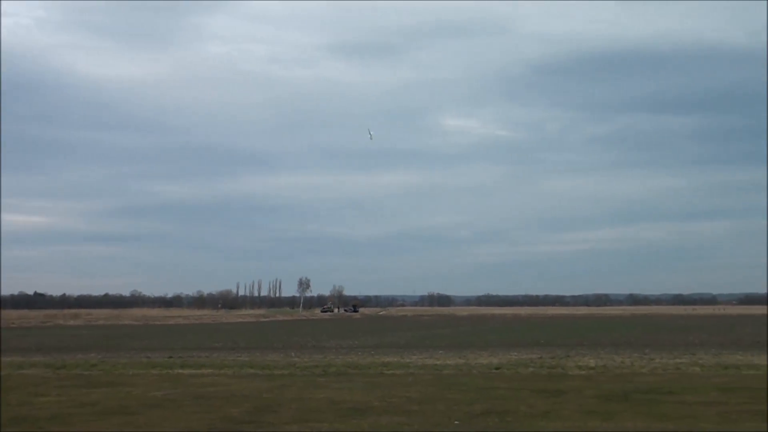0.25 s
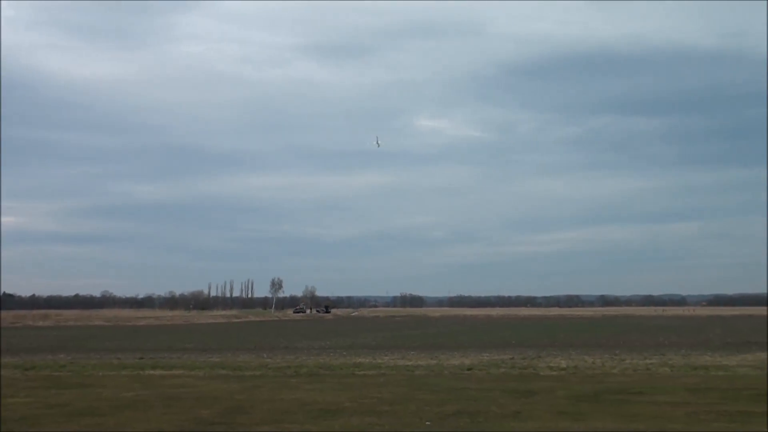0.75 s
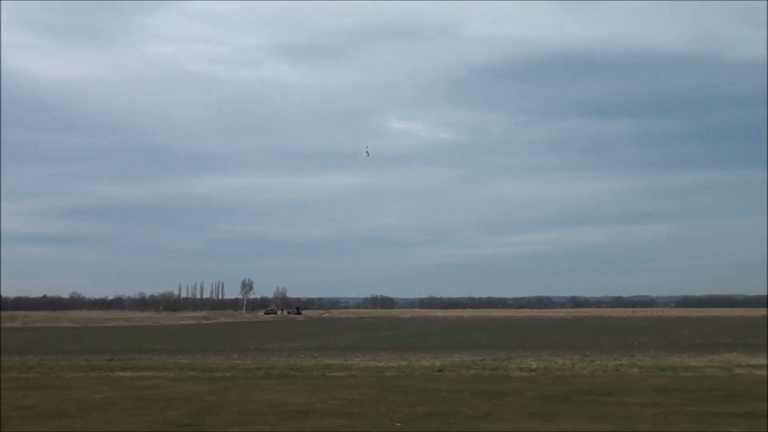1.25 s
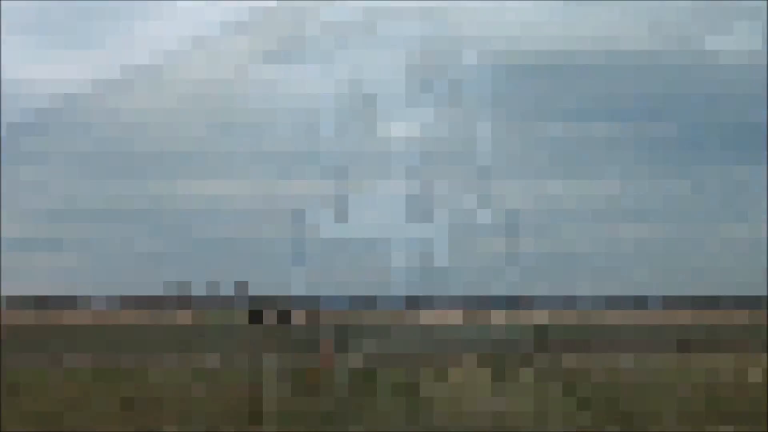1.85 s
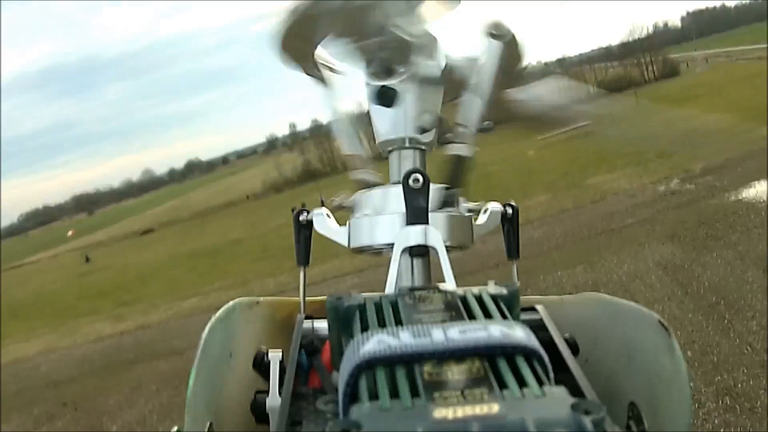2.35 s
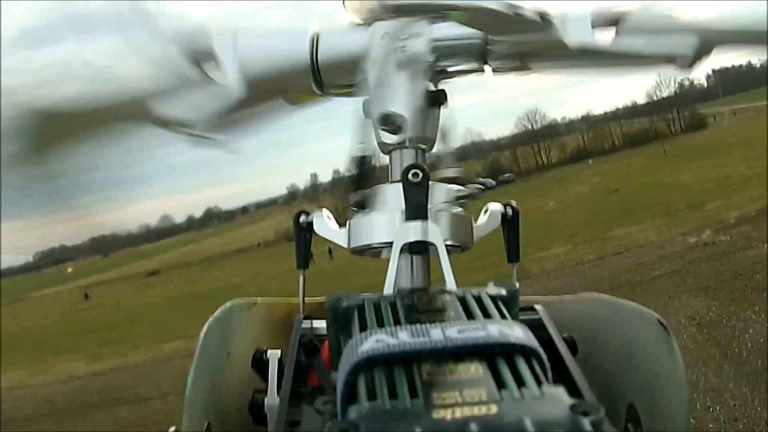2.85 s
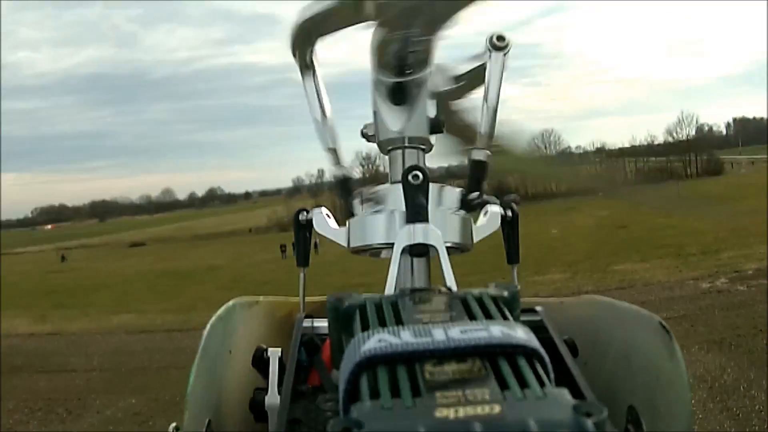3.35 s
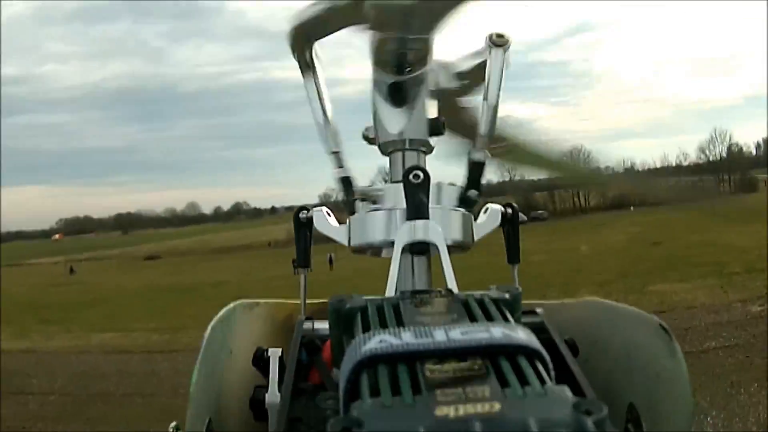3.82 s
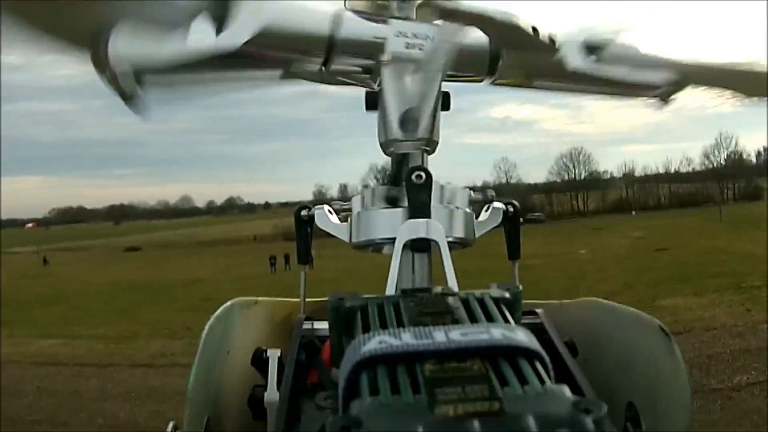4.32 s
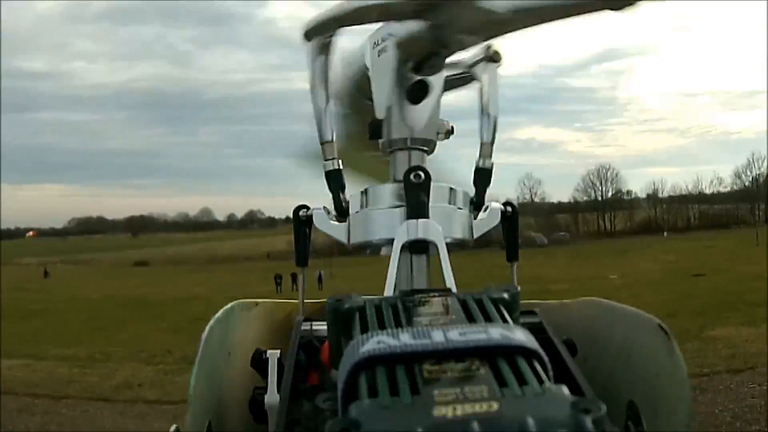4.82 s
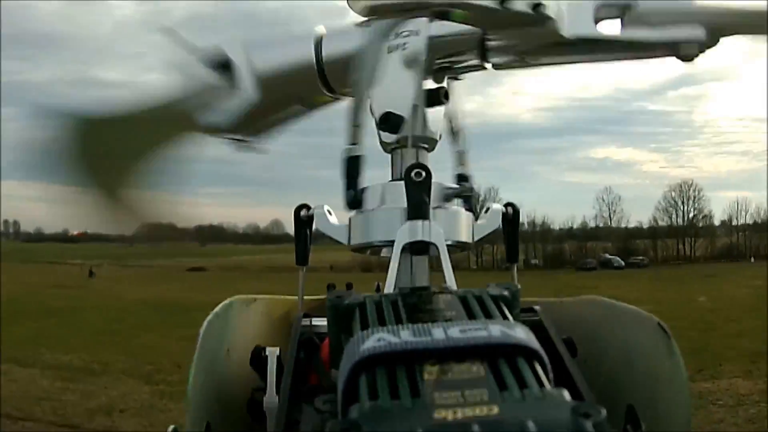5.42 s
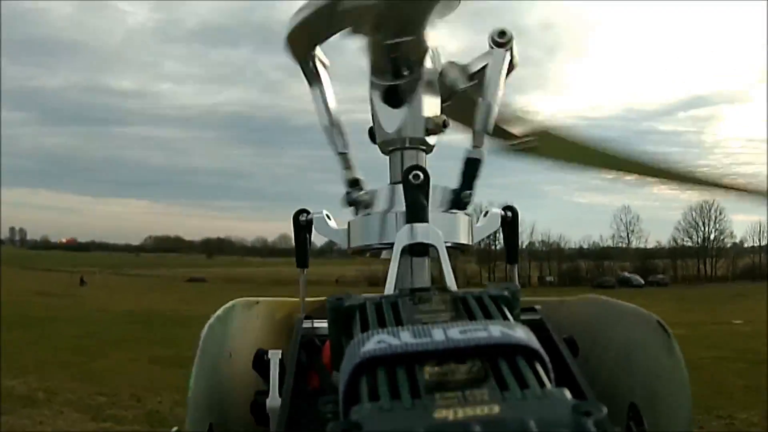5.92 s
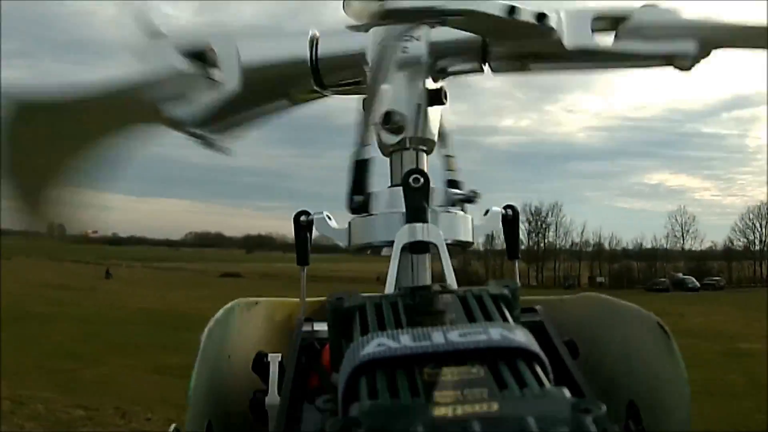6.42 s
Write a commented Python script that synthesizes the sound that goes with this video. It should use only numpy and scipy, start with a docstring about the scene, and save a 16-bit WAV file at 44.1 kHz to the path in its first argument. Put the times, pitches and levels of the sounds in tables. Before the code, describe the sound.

In an open field, wind rumbles and slaps against a microphone on the ground while an electric model helicopter passes high up, its blades swishing and gears whining thinly as it recedes. After about two seconds the sound fades over to a microphone riding on the helicopter. The motor becomes a harsh, overloaded buzz at one steady pitch, roughened by rattling and breaking at times into a rapid, sizzling flutter.

```python
"""In a field, an electric model helicopter circles high up while wind buffets a microphone on the ground.
Its blades swish, its tail rotor buzzes and its gears whine. Near 1.9 s the sound fades over to a camera
riding on the helicopter. There the motor's shaking overloads the microphone into a square-wave drone,
roughened by the tail shaft, gears and blades. At times the drone flutters."""
import sys
import numpy as np
from scipy import signal
from scipy.fft import rfft, irfft, next_fast_len
from scipy.io import wavfile
from scipy.ndimage import uniform_filter1d, map_coordinates

SR = 44100
rng = np.random.default_rng(int(sys.argv[2]) if len(sys.argv) > 2 else 0)


def store_wav(level_fs):
    """Save 16-bit WAV to argv[1]."""
    pcm = np.round(np.clip(np.atleast_2d(level_fs), -1, 1) * 32767)
    wavfile.write(sys.argv[1], SR, pcm.T.astype(np.int16))


N = 294147

# Tone colours, or how strong each pitch is next to the others: pitch_hz, gain_db
WIND_RUMBLE = [(12, -42), (20, -24), (91, 0), (117, -1), (164, -2), (244, -5.5), (277, -10.5), (399, -18.5),
               (507, -24.5), (900, -30.5), (1170, -41), (1980, -120)]
BUFFET_BODY = [(40, -35), (130, -7.5), (300, -2.5), (460, -11), (800, -29), (1500, -41), (4000, -51),
               (9000, -120)]
BUFFET_EDGE = [(200, 6), (600, 12), (1000, -5), (1500, -9), (3000, -33), (6000, -74), (10000, -120)]
BLADE_SWISH = [(300, -10), (650, 9.5), (1000, 3), (1300, 6.5), (1900, 4.5), (2800, 0), (4500, -15),
               (6000, -32), (10000, -50)]
BLADE_HISS = [(2650, -32), (4700, -1.5), (5400, -6.5), (7060, -8), (7870, -6), (8820, -14.5),
              (10200, -15.5), (11900, -26), (15500, -28)]
DEEP_RUMBLE = [(12, -25), (28, 0), (85, 1), (130, -14), (800, -120)]
GEAR_RASP = [(2600, -19), (3200, -11.5), (3550, -2), (3800, -7), (4050, -10), (4400, -12), (5400, -49)]
RATTLE = [(200, 4.5), (900, 0.5), (3000, 0), (6000, -9), (11000, -12.5), (16000, -10.5)]
DOWNWASH = [(20, 7.5), (100, 3.5), (300, -0.5), (800, -0.5), (2000, -31.5)]
GRIT = [(300, -0.5), (700, 6.5), (2000, 3.5), (6000, -4.5), (16000, -7.5)]
SIZZLE = [(800, 2), (2200, 8), (5000, -4), (9000, -0.5), (15000, 1)]
ONBOARD_TONE = [(20, 1.5), (100, 1), (340, 0.5), (1000, 1), (2000, 1.5), (4000, 2.5), (9000, 1),
                (15000, -2.5)]
# Gusts on the ground microphone: peak_s, gain_db, build_s, fall_s
GUSTS = [(.06, -10, 0.75, 0.26), (.8, -16, 0.094, 0.035), (1.185, -28.5, 0.097, 0.012),
         (1.61, -27.5, 0.16, 0.14)]
# Sharp slaps of wind, each with a low thump: start_s, gain_db, decay_s, relative_thump_db
BUFFETS = [(.089, -20, 0.064, -27), (0.219, -7.5, 0.012, -2), (0.328, -25.5, 0.045, -4),
           (0.567, -22, 0.017, 5), (0.768, -16, 0.0087, -10), (.792, -23.5, 0.046, -22),
           (1.185, -20, 0.0093, 2), (1.589, -14, 0.0028, -14), (1.612, -22, 0.0052, -4),
           (1.705, -31, 0.011, 12), (1.806, -28.5, 0.041, 7.5), (1.88, -32.5, .03, 6)]
# Tones of the tail rotor: harmonic_number, gain_db
TAIL_TONES = [(1, 4), (2, 3), (3, -18), (4, -0.5), (5, -4), (6, -0.5), (7, -11)]
# The whine swells as the gear faces the listener: centre_s, half_width_s, gain_db
WHINE_SWELLS = [(.45, 0.19, -32), (1.13, 0.18, -48), (1.66, .14, -51)]
# How the blades' high hiss fades: time_s, gain_db
HISS_FADE = [(0, -52.5), (.45, -56), (.66, -53.5), (.81, -60), (1.45, -62), (1.85, -77)]
# How the onboard drone grows: time_s, gain_db
DRONE_GROWTH = [(1.97, -29), (2.3, -23), (2.89, -24), (4.5, -19), (5.84, -19), (6.47, -19), (6.67, -19)]
# Spells when the drone flutters: centre_s, length_s, depth_0_to_1
FLUTTER_SPELLS = [(2.04, .17, 0.53), (2.23, 0.08, 0.79), (2.51, 0.19, 0.57), (3.085, 0.62, 0.58),
                  (4.222, 0.22, 0.64), (4.71, 0.39, 0.28), (5.732, 1.15, 0.6), (6.63, 0.26, 0.6)]

NEAREST_S, SWITCH_S = 0.51, 1.87  # the helicopter is closest; the fade to its camera begins
MESH_HZ, CLIMB_HZ_PER_S, CURVE_HZ_PER_S2 = 3960, 40, 29  # the gear tone climbs as the helicopter turns
MOTOR_HZ, CREEP_HZ_PER_S = 339.1, 0.27  # a speed controller holds the motor almost steady
BOUNCE_LAG_S, PASS_S = 0.00063, 0.3  # longest lag of the ground echo; time scale of the fly-by
FLUTTER_HZ, SPELL_EDGE_S = 23.4375, 0.023  # bursts a second; how gently a spell starts and ends
SNAP_S = 0.0072  # buffets shorter than this are much brighter
TOP_HZ = 15500


def amp(db):
    """Turn decibels into a gain to multiply by."""
    return 10 ** (np.asarray(db) / 20)


def unit(x):
    """Scale to an average (rms) level of 1."""
    return x / np.sqrt(np.mean(x ** 2) + 1e-20)


def clock():
    """The time of each sample in seconds."""
    return np.arange(N) / SR


def curve(rows):
    """Join (time, value) points with straight lines."""
    return np.interp(clock(), *np.transpose(rows))


def wobble(rate):
    """A smooth random curve through rate points a second."""
    return map_coordinates(rng.standard_normal(int(N * rate / SR) + 4), [clock() * rate])


def angle(hz):
    """The running angle of something that turns hz times a second."""
    return 2 * np.pi * np.cumsum(hz) / SR


def filtered(x, response):
    """Scale each pitch in x by response(hz)."""
    size = next_fast_len(N + 8192)
    return irfft(rfft(x, size) * response(np.fft.rfftfreq(size, 1 / SR)), size)[..., :N]


def coloured(x, colour):
    """Give x a tone colour."""
    pitch_hz, gain_db = np.transpose(colour)
    return filtered(x, lambda hz: amp(np.interp(np.log(hz + 1), np.log(pitch_hz), gain_db)))


def noise(colour):
    """Noise with a tone colour, at level 1."""
    return unit(coloured(rng.standard_normal(N), colour))


def beat(turn, depth_db):
    """A gain that pulses once a turn."""
    return unit(amp(depth_db * np.cos(turn / 2) ** 4))


def faint_hiss():
    """A quiet, even hiss behind the sounds in the field."""
    return amp(-63.5) * noise([(100, 0), (10000, 0), (15000, -4)])


def swirling_air(colour, side_db):
    """Swirling air sounds a little different on the left and right."""
    mid, side = noise(colour), amp(side_db) * noise(colour)
    return np.array([mid + side, mid - side])


def wind():
    """Rumbling gusts build and fall; short, brighter buffets hit the microphone and die away."""
    t = clock()
    strength = amp(-51)  # the breeze between gusts
    for peak_s, db, build_s, fall_s in GUSTS:
        strength += amp(db) * np.exp(-np.maximum((peak_s - t) / build_s, (t - peak_s) / fall_s))
    rumble = swirling_air(WIND_RUMBLE, side_db=-12)
    deep = swirling_air(DEEP_RUMBLE, side_db=-12)
    body, edge = swirling_air(BUFFET_BODY, side_db=4.5), noise(BUFFET_EDGE)
    air = strength * amp(-1.65 + 2.8 * wobble(30.36)) * rumble
    air += amp(-18.5) * strength ** 0.53 * deep  # follows gusts loosely, so weak wind sounds duller
    for start_s, db, decay_s, thump_db in BUFFETS:
        age = np.maximum(t - start_s, 0)
        rise = 1 - np.exp(-(age / 0.0016) ** 2)
        brightness = amp(-27) * (1 + (SNAP_S / decay_s) ** 3)
        slap = body + amp(thump_db) * rumble + brightness * edge
        air += amp(db) * rise * np.exp(-age / decay_s) * slap
    return air


def restless_air(x, depth_db):
    """Moving air makes patches of high and low pitches louder or softer."""
    spectrum = signal.stft(x, nperseg=1024)[2]
    patches = uniform_filter1d(rng.standard_normal(spectrum.shape), size=4, axis=0)
    patches = unit(uniform_filter1d(patches, size=16, axis=1))
    return unit(signal.istft(spectrum * amp(depth_db * patches), nperseg=1024)[1][:N])


def ground_bounce(x):
    """A weak echo off the ground lags most when the helicopter is nearest, so the tone colour sweeps."""
    lag_s = BOUNCE_LAG_S / np.hypot(1, (clock() - NEAREST_S) / PASS_S)
    echo = map_coordinates(x, [np.arange(N) - lag_s * SR], order=3)
    return unit(x + 0.17 * echo)


def distant_helicopter():
    """Blades chop the air, the tail rotor buzzes and gear teeth whine, all fading as it flies away."""
    t = clock()
    before, after = np.maximum(NEAREST_S - t, 0), np.maximum(t - NEAREST_S, 0)
    flyby_db = -41 - 0.5 * before - 13 * after ** 1.24
    hiss_db = curve(HISS_FADE)
    swells = sum(amp(db) * np.exp(-((t - s) / width) ** 2) for s, width, db in WHINE_SWELLS)
    whine_gain = amp(flyby_db - 3.5) + swells
    mesh_hz = MESH_HZ + CLIMB_HZ_PER_S * t + CURVE_HZ_PER_S2 * t ** 2
    mesh = angle(mesh_hz * (1 + 0.00064 * wobble(26.4)))
    rotor, tail = mesh / 113, mesh / 12.93
    chop = beat(2 * rotor, depth_db=7) * beat(tail, depth_db=4.5)  # two main blades, and the tail's
    swish = ground_bounce(restless_air(noise(BLADE_SWISH), depth_db=1.5)) * amp(flyby_db + 5.5)
    hiss = amp(hiss_db + 6) * noise(BLADE_HISS)
    buzz = np.zeros(N)
    for harmonic, db in TAIL_TONES:
        gain = amp(db + 3 * wobble(7))
        buzz += gain * np.sin(harmonic * tail + 0.15 * wobble(39.5) + rng.uniform(0, 2 * np.pi))
    buzz *= amp(0.71 * flyby_db - 17.5)  # the tones fade less than the swish
    blade_load = np.sin(2 * rotor)  # each blade strains the gear, adding side tones to its whine
    whine = whine_gain * amp(-7 + 2 * wobble(14)) * np.sin(mesh + 0.7 * blade_load + 0.4 * wobble(150))
    octave = amp(hiss_db - 6 + 3 * wobble(9.7)) * np.sin(2 * mesh + blade_load + 0.8 * wobble(150))
    rasp = amp(-7.5) * whine_gain * noise(GEAR_RASP)
    return (swish + hiss + rasp) * chop + buzz + whine + octave


def spells():
    """How deep the flutter is over time, one row for each spell."""
    return np.array([depth * (0.5 + 0.5 * np.tanh((length / 2 - abs(clock() - s)) / (2 * SPELL_EDGE_S)))
                     for s, length, depth in FLUTTER_SPELLS])


def rattle():
    """The shaking frame makes spiky noise that comes in clumps."""
    grain = noise(RATTLE)
    clumps = amp(1.8 * wobble(55))
    return amp(3.26 * wobble(500)) * clumps * grain


def frame_shaking(motor):
    """The off-balance motor, tail shaft, blades, gears, downward air and rattle all shake the camera."""
    rotor, tail = motor * 12 / 115, motor * 0.4642
    shafts = np.sin(motor) + 0.17 * amp(wobble(14)) * np.sin(tail) + 0.047 * np.sin(2 * rotor)
    gear = 0.011 * np.sin(12 * motor + 2.1 * wobble(60))
    downwash = 0.13 * noise(DOWNWASH)
    load = beat(2 * rotor, depth_db=-1.5) * beat(rotor, depth_db=3.5) * beat(tail, depth_db=1)
    rattle_db = -16 + spells().sum(axis=0) + wobble(14)  # a little louder during flutter
    return shafts + gear + downwash + amp(rattle_db) * load * rattle()


def flutter(drone, motor):
    """In spells, the drone breaks into a harsh, sizzling buzz about 23 times a second."""
    turn = 2 * np.pi * (clock() * FLUTTER_HZ - 0.84)
    # each spell is half a beat off the one before
    share = sum(spell * np.abs(np.cos((turn + k * np.pi) / 2)) ** 1.65 for k, spell in enumerate(spells()))
    grit = amp(8.2 * wobble(600)) * noise(GRIT)
    slip = 2 * turn + 0.24 * wobble(30)  # puts two tones just under the third and fifth harmonics
    slipped = np.cos(3 * motor - slip) + 0.54 * np.cos(5 * motor - slip)
    tones = slipped + 0.76 * np.sin(motor) + 0.43 * np.sin(3 * motor)
    buzz = np.tanh(18 * (tones + grit))
    sizzle = noise(SIZZLE) * amp(2.1 * wobble(750) + 1.5 * wobble(25))
    return (1 - share) * drone + share * (buzz + 0.42 * unit(sizzle))


def onboard_drone():
    """The overloaded microphone flattens the shaking into a square wave, roughened by the rattle."""
    motor = angle(MOTOR_HZ + CREEP_HZ_PER_S * (clock() - SWITCH_S) + 0.15 * wobble(2))
    square = np.tanh(30 * frame_shaking(motor))
    fizz = amp(-20.5) * noise([(100, 0), (3000, 0), (15000, -2)])
    return amp(curve(DRONE_GROWTH) + 1.55) * coloured(flutter(square, motor) + fizz, ONBOARD_TONE)


def scene():
    """The sound on the ground fades out as the sound on board fades in."""
    t = clock()
    ground = np.clip(t / 0.0013, 0, 1) * np.clip(1 - (t - SWITCH_S) / 0.47, 0, 1)
    aboard = np.clip((t - SWITCH_S) / 0.13, 0, 1)
    return ground * (distant_helicopter() + wind() + faint_hiss()) + aboard * onboard_drone()


def record(dry):
    """Gently round off the strongest peaks and remove everything above TOP_HZ."""
    rounded = dry / (1 + dry ** 4) ** (1 / 4)
    return filtered(rounded, lambda hz: hz < TOP_HZ)


dry = scene()
out = record(dry)
store_wav(out)
```